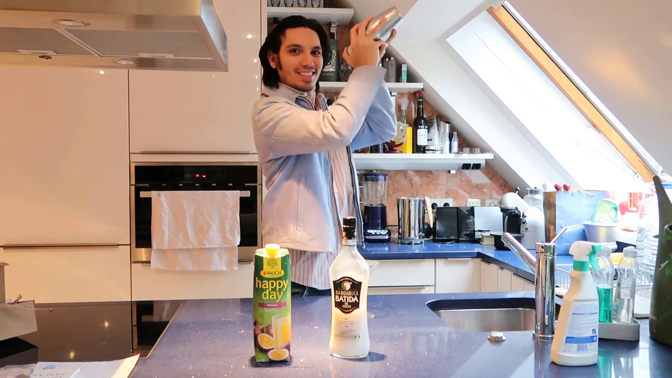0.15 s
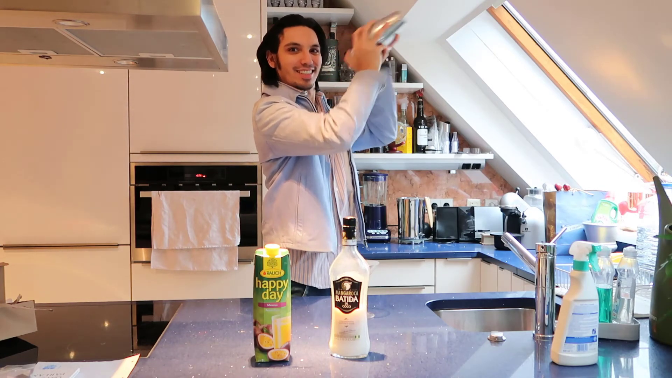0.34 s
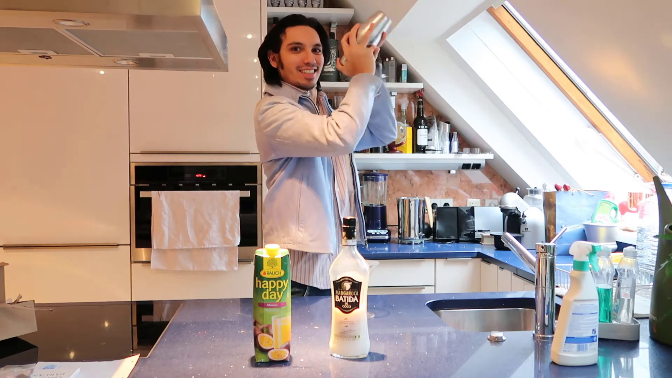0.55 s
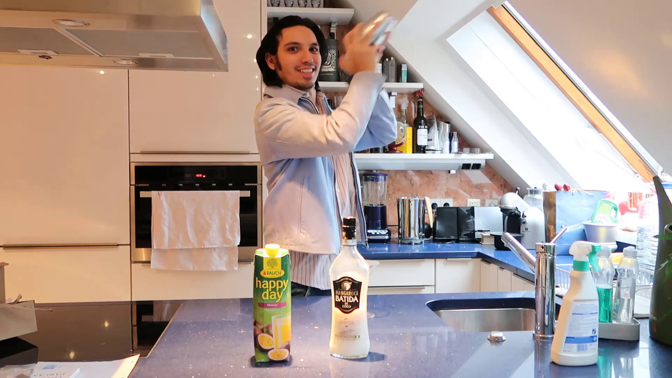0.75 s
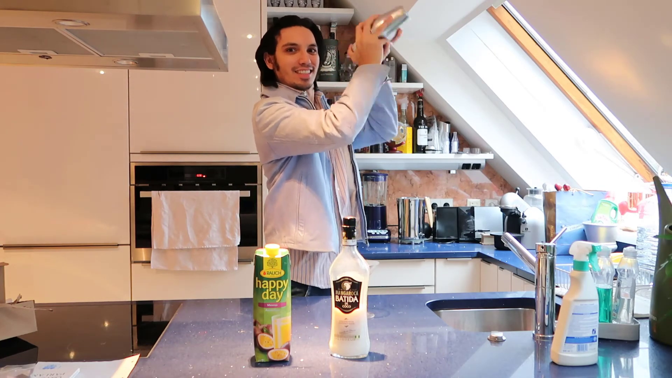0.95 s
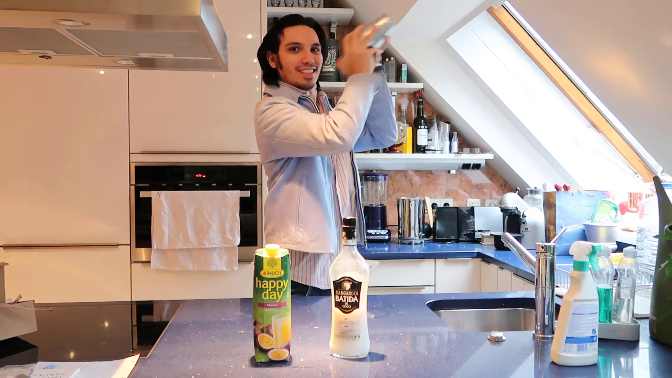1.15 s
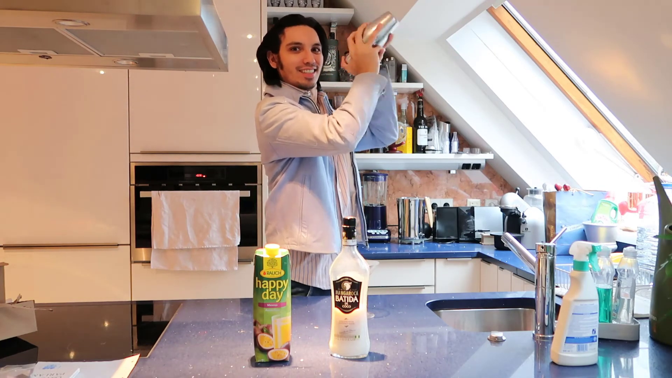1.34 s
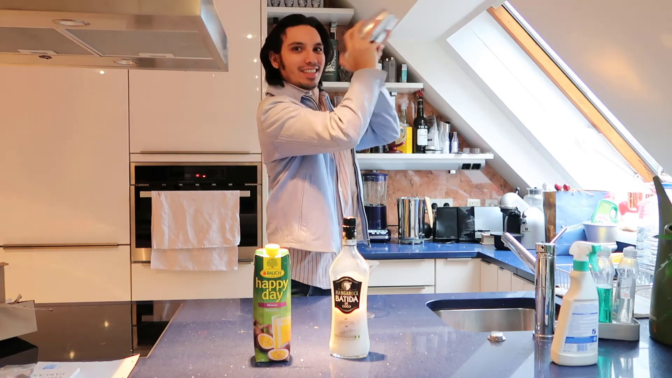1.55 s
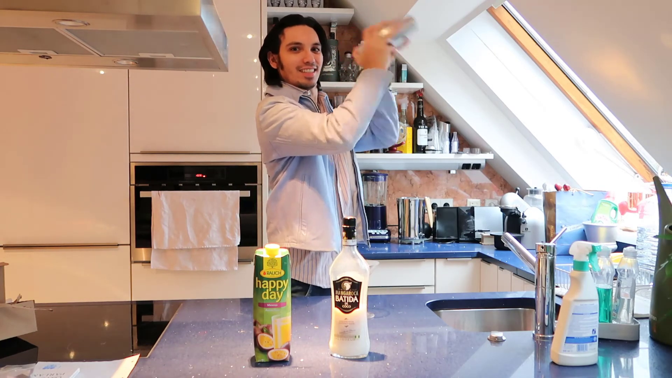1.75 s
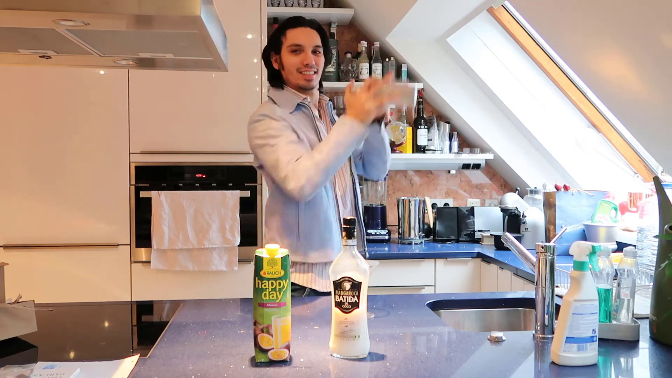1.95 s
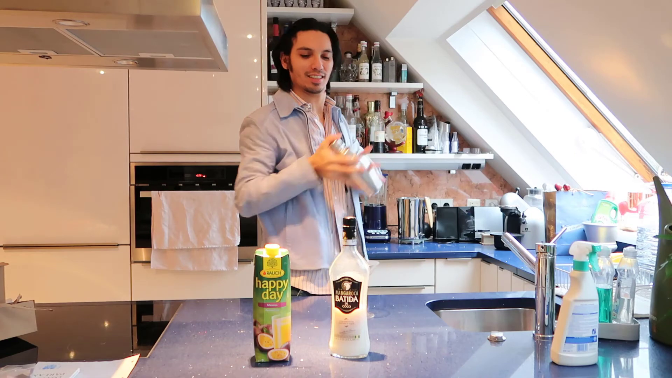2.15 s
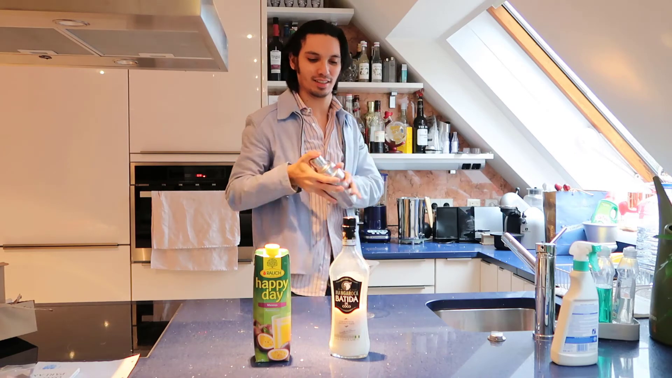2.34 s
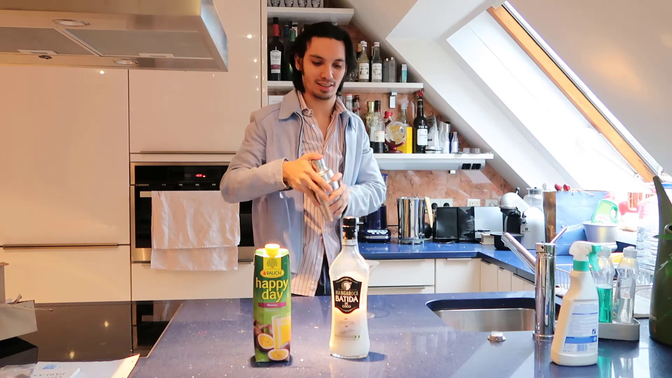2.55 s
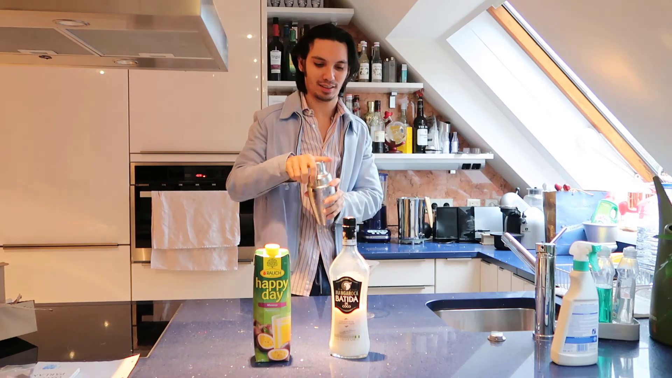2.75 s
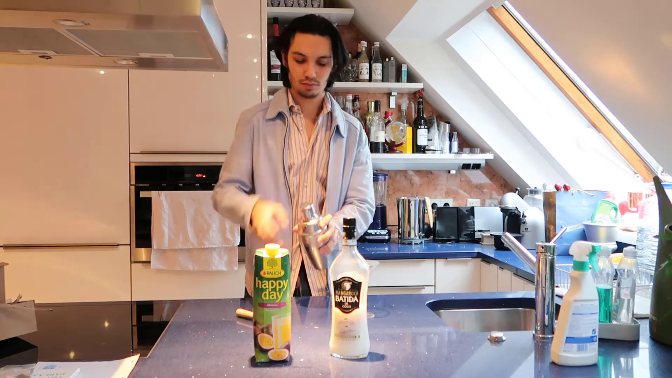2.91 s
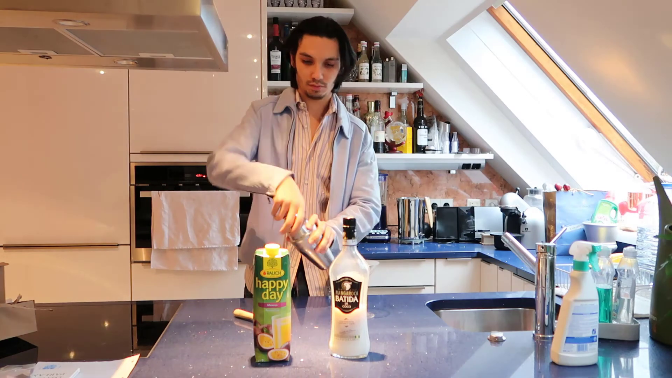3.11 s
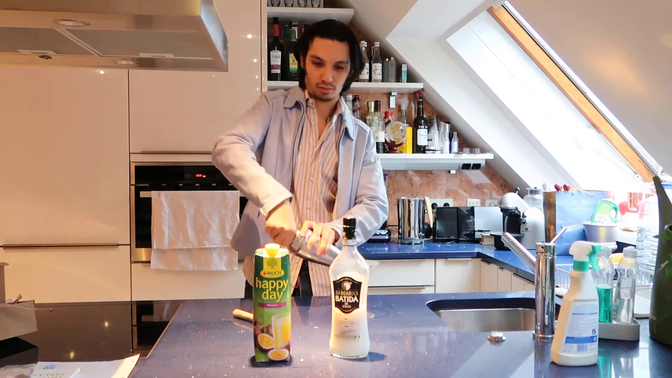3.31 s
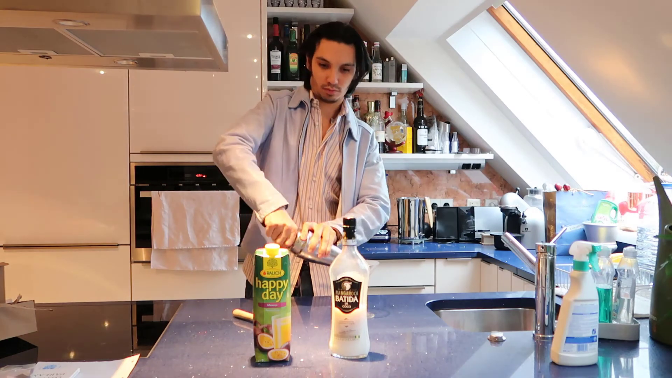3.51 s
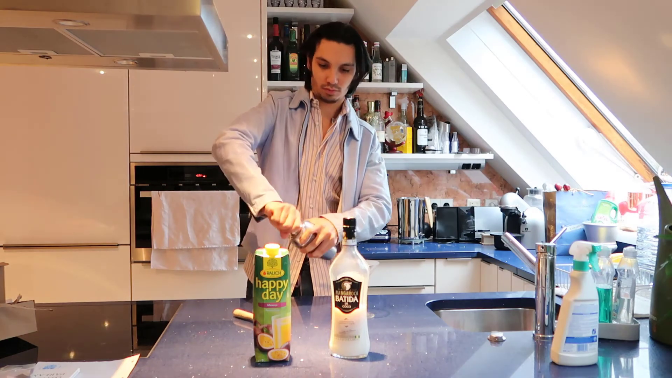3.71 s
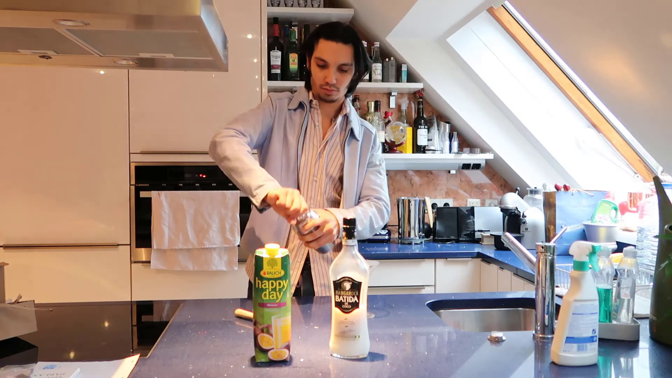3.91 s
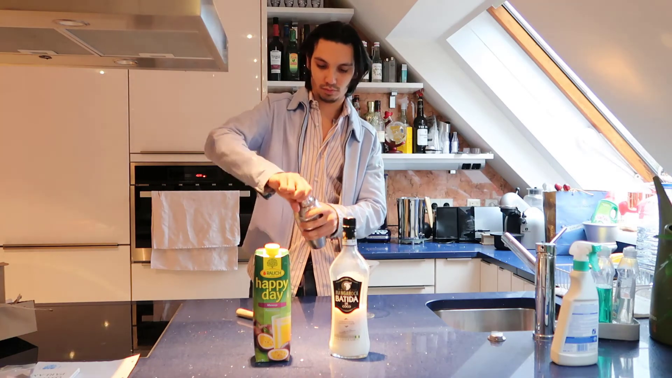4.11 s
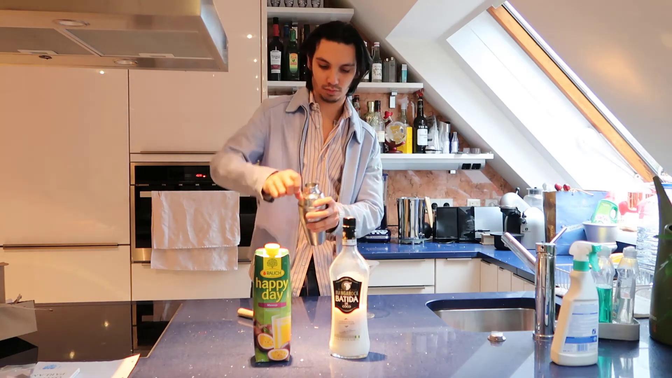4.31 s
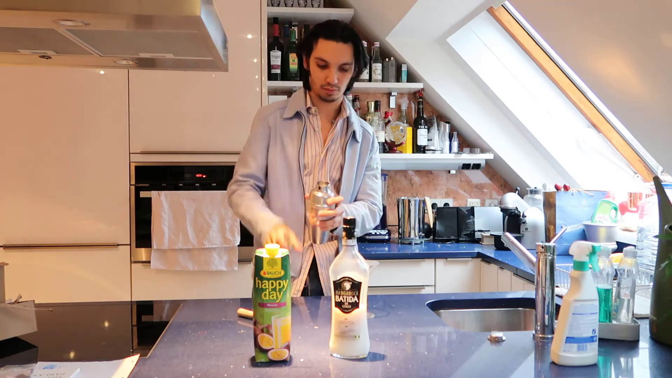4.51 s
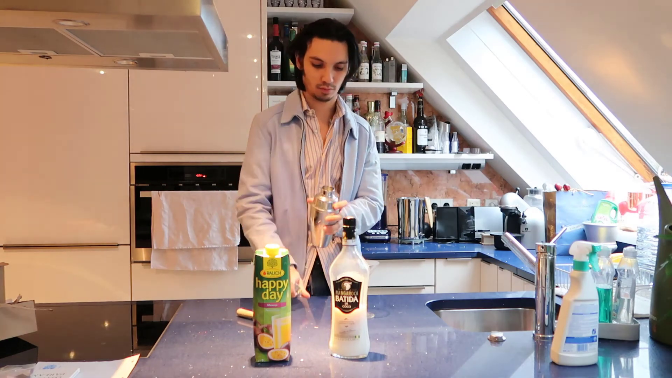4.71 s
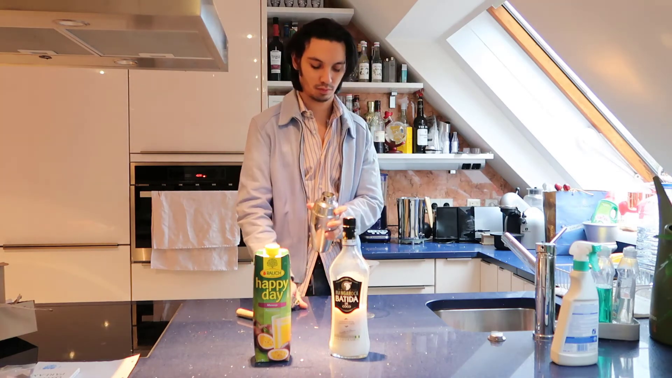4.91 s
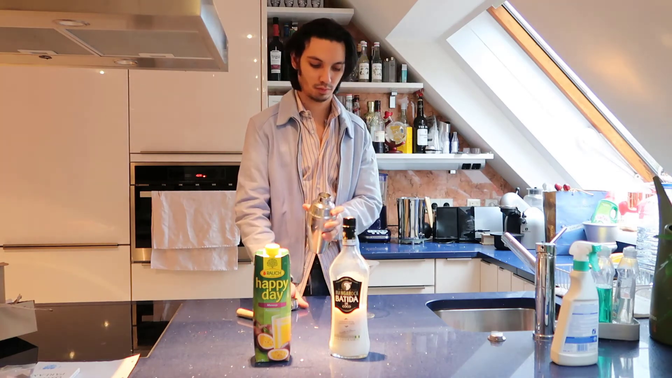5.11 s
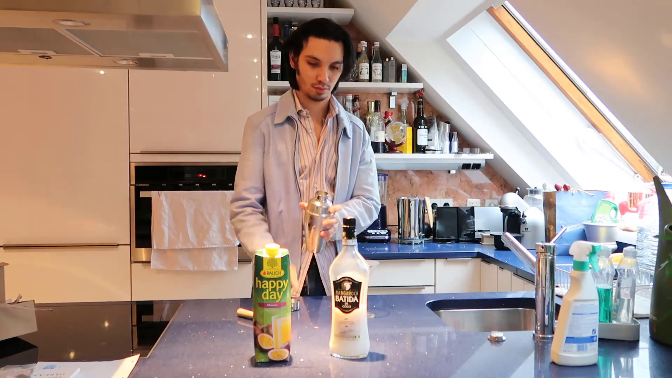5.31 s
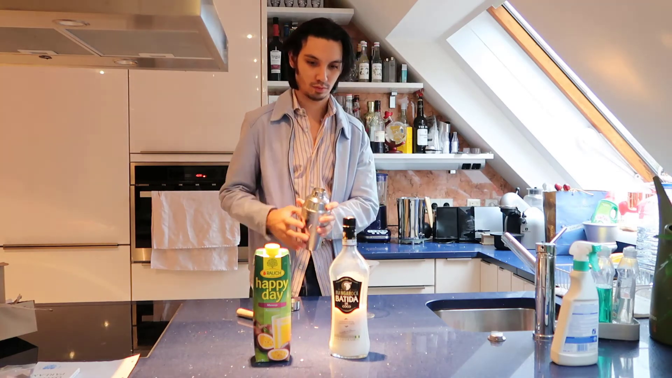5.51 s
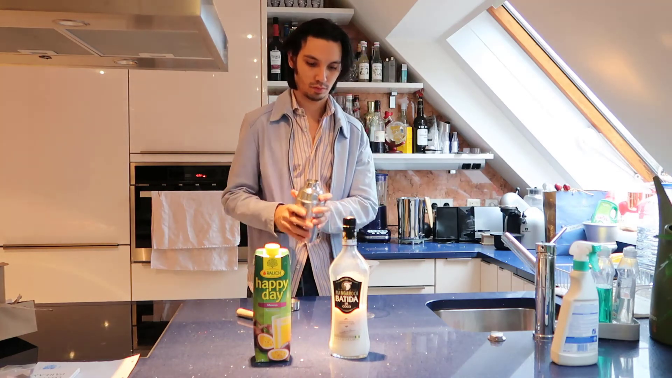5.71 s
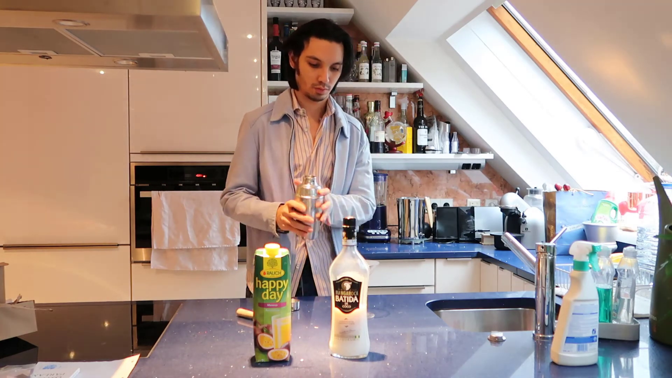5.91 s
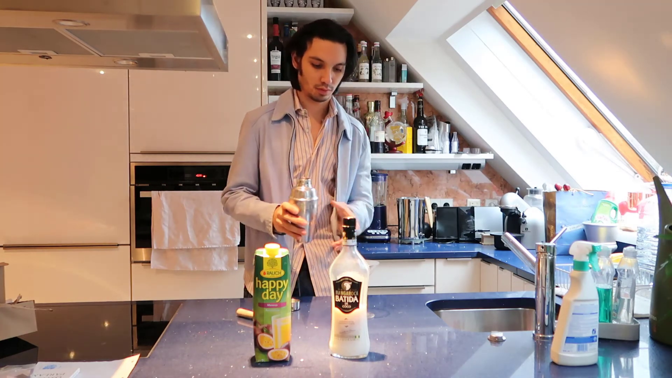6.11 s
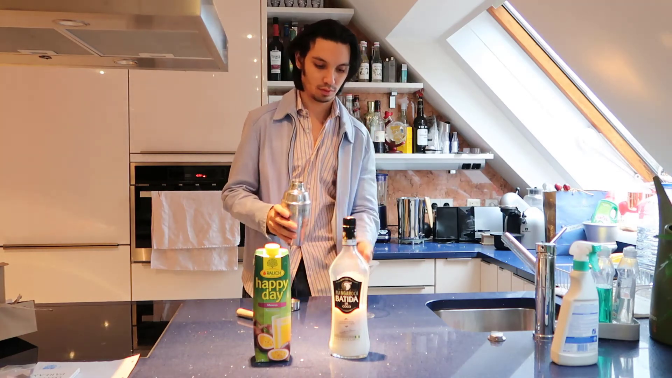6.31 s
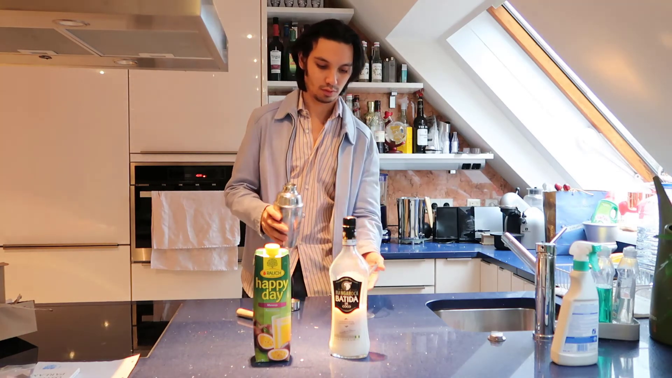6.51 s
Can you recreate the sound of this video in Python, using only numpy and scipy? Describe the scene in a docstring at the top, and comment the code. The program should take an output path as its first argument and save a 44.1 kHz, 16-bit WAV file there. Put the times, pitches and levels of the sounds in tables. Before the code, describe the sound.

Ice rattles hard in a hand-shaken steel shaker, slows and stops, then the cap and strainer top clack onto a stone kitchen counter.

```python
"""Ice in a steel cocktail shaker

Ice cubes rattle in a hand-held steel shaker in a small hard kitchen, then slide as it is tilted and opened.
Cap, then strainer top, are put down on a stone counter, where they ring and chatter.
Struck parts are banks of decaying sines; lid friction, drink and room noise are filtered noise.
Hum, a thin whine and room noise lie below; two close microphone ports listen, under gain control."""
import sys
import numpy as np
from scipy import signal
from scipy.fft import rfft, irfft, next_fast_len
from scipy.io import wavfile
from scipy.ndimage import uniform_filter1d

SR = 44100
rng = np.random.default_rng(int(sys.argv[2]) if len(sys.argv) > 2 else 0)


def how_loud(loudness_db):
    """Turn decibels into a plain amplitude multiplier (0 dB gives 1, 20 dB gives 10)."""
    steps = np.asarray(loudness_db, float) / 20
    return 10 ** steps


def store_wav(level_fs):
    """Save 16-bit WAV to argv[1]."""
    pcm = np.round(np.clip(np.atleast_2d(level_fs), -1, 1) * 32767)
    wavfile.write(sys.argv[1], SR, pcm.T.astype(np.int16))


N = 288855

# All levels are ahead of gain control. Mode levels add to blow strengths.
# room noise, port sum; shape only: (frequency [Hz], density [dB])
FLOOR_SHAPE = [(20, -16), (40, -7.5), (70, -11.5), (130, -11), (300, -13.5), (475, -16), (1100, -22),
               (2200, -23), (4000, -30), (8000, -41.5), (12000, -42.5), (13500, -42), (15000, -86)]
# room noise, port difference; shape only: (frequency [Hz], density [dB])
FLOOR_SIDE_SHAPE = [(25, -39), (95, -7.5), (450, -5.5), (600, -11.5), (1900, -18), (3350, -23.5),
                    (9270, -35), (12800, -33), (13600, -45), (15000, -73)]
FLOOR_DB_RMS, FLOOR_SIDE_DB_RMS = -52, -54.5
HUM_HZ, HUM_DB_RMS, HUM_WAVER_DB = 100, -51, 0.9
# whine, port difference only: (frequency [Hz], level before WHINE_SIDE_DB is added [dB rms])
WHINE_TONE = [(13006, -86.5)]
WHINE_WIDTH_HZ, WHINE_SIDE_DB = 120, 16.5

# near reflections off counter, sloped ceiling, cupboards: (mean lag [s], level re direct [dB])
NEAR_ECHOES = [(.0032, -6), (.0058, -8.5), (.011, -12)]
# reverberant tail: (frequency [Hz], t60 [s], relative level [dB])
ROOM_TAIL = [(247, 0.73, -7), (650, 0.37, 6), (1790, 0.44, -2.5), (4080, 0.43, 2.5), (7650, 0.38, -4),
             (14200, 0.27, -6.5)]
TAIL_DB = -4   # tail energy re direct
PLACES, PLACE_S, ECHO_SHIFT = 6, .05, .25   # room paths, step from one to the next, lag change as a share
# spectrum of the port difference: (frequency [Hz], level re port sum [dB])
PORT_WIDTH = [(60, -40), (110, -43), (200, -20), (380, -35), (700, -18), (1290, -22.5), (2380, -16),
              (4400, -6), (8120, 2.5), (15000, 8.5)]
DIRECT_SHARE = .3   # power share of the difference derived from the sum

# lid jerking on its seat as it is twisted off: (time [s], friction [dB rms])
LID_JERKS = [(3.24, -60.5), (3.703, -47.5), (3.79, -56.5), (3.94, -63)]
TWIST_HZ, SLIPS_PER_S = (5000, 13500), 3700
TWIST_RISE_S, TWIST_FADE_DB_PER_S = 0.0035, 200

# cap on counter: (time [s], strength [dB], counter knock re ring [dB])
CAP_CONTACTS = [(2.818, -17, -0.5), (2.8448, 2, -25), (2.848, -20, 15.5), (2.861, -7, -2),
                (2.8865, -4, -6.5), (2.899, -9, -2.5), (2.914, -15, 5.5)]
# cap modes: (frequency [Hz], level [dB], t60 [s])
CAP_MODES = [(1850, -22.5, 0.021), (2080, -30, 0.03), (2500, -39, 0.011), (2840, -23, 0.023),
             (3600, -18, 0.029), (3176, -32, .09), (3590, -17, 0.04), (3652, -20, .05), (3690, -18, .12),
             (3745, -21, .045), (3775, -20, 0.027), (3210, -19.5, 0.02), (4540, -18, 0.017),
             (4730, -23.5, 0.034), (5370, -19.5, 0.0052), (6340, -24, 0.0022), (8700, -31.5, 0.0086)]
# strainer top on counter: (time [s], strength [dB], counter knock re ring [dB])
STRAINER_CONTACTS = [(4.9432, 6, -15.5), (4.947, -2, -20), (4.957, -22, 2), (4.979, -27, 3),
                     (5.009, -25, -8), (5.166, -15.5, -1.5), (5.199, -27, 1), (5.24, -31, 0),
                     (5.247, -24.5, 3.5), (5.268, -38, 2), (5.297, -29, 5), (5.302, -24, -1),
                     (5.332, -37, 3)]
# strainer modes: (frequency [Hz], level [dB], t60 [s])
STRAINER_MODES = [(1210, -22, 0.0066), (1510, -27, 0.025), (1815, -18.5, 0.0085), (2030, -6, 0.0088),
                  (2200, -17.5, 0.014), (2380, -13, 0.01), (2610, -19, 0.014), (3070, -19, 0.016),
                  (3380, -24, 0.019), (3860, -17, 0.0066), (4250, -22, 0.0078), (4630, -19.5, 0.006),
                  (5310, -17, 0.005), (6040, -21, 0.0069), (5862, -23, .035), (6030, -23, .035),
                  (6068, -21, .05), (6630, -38, 0.014), (7300, -32, 0.0031), (11080, -37, 0.018)]
# stone counter modes: (frequency [Hz], level [dB], t60 [s])
COUNTER_MODES = [(214, -35.5, 0.021), (342, -23.5, 0.0093), (596, -21, 0.0091), (860, -21, 0.028),
                 (1360, -6, 0.0034), (2340, -10, 0.0082), (4500, -30, 0.0033), (8000, -23, 0.0026)]
CHATTER_S, CHATTER_DB, CHATTER_FADE_DB = 0.03, -9.5, -14.5   # rebound time span, first level, further drop
DULLING_PER_OCTAVE = 0.2   # dB per octave about 1 kHz, per dB below the hardest touch
CONTACT_CYCLES = 0.85   # approximate swell of each mode

# shell modes, damped by hands and drink: (frequency [Hz], level [dB], t60 [s])
SHELL_MODES = [(687, -60, 0.0067), (930, -37, 0.0085), (1350, -16, 0.0074), (1476, -16.5, 0.012),
               (1640, -13, 0.0089), (1834, -12, 0.014), (2020, -14, 0.012), (2284, -13, 0.015),
               (2507, -7, 0.0083), (2800, -7.5, 0.006), (3080, -12.5, 0.0062), (3620, -7.5, 0.004),
               (4247, -13, 0.0078), (4530, -8, 0.0045), (5250, -15, 0.0042), (5900, -15, 0.0046),
               (6700, -18, 0.0027), (7840, -17.5, 0.0023), (9600, -17.5, 0.001), (13400, -17, 0.00081)]
# air in the open neck, one mode: (frequency [Hz], level [dB], t60 [s])
NECK_MODE = (2143, -9.5, 0.023)
OPENED_S = 3   # the neck rings from here
LOW_BELOW_HZ, HIGH_ABOVE_HZ = 2150, 3500   # bounds of low, middle and high shell modes
CONTACT_SCATTER_S_PER_KHZ = .0003   # a rolling cube wakes high modes most loosely in time
RADIATES_HZ = (626, 12200)   # a small shell sends little bass; soft wet contacts make little treble
# single cubes on the wall: (time [s], middle modes [dB], low modes [dB], high modes [dB])
CUBE_BLOWS = [(0.018, -9, -12, -4), (0.0416, -5, -30, -4), (0.0482, -10, -13, -11), (0.1047, 4, 4, 1),
              (0.148, -7.5, -16, -26), (0.2112, -9.5, -34, -22), (0.2403, -5.5, -34, -12.5),
              (0.3401, -2, -35, -5.5), (0.247, -12.5, -37, -25), (0.3533, -2, -24, -22),
              (0.361, -2.5, -30, -15), (0.3683, -5, -27, -26), (0.426, -8.5, -22, -21),
              (0.4398, -3.5, -1, -18), (0.4439, -4.5, -12, -26), (0.4547, -7, -15, -22),
              (0.468, -7, -14, -3), (0.564, -6, -28, -18), (0.567, -12, -29, -23), (0.593, -6.5, -25, -23),
              (0.6556, 0, -22, -4.5), (0.6683, -6, -23, -30), (0.7164, -6.5, -37, -32),
              (0.7575, -9, -19, -29), (0.8007, -14, -30, -9), (0.851, -7, -24, -13.5),
              (0.877, -3, -32, -24), (0.8801, -5, -26, -16), (0.8929, 4, -6, -7), (0.8975, -2, 2, -9),
              (0.9667, -4, -26, -8.5), (0.9839, -14, -32, -5), (1.086, -7.5, -26, -12),
              (1.111, -9, -25, -6.5), (1.1633, -3.5, -15, -30), (1.1965, -1.5, -14, -18),
              (1.3063, -4.5, -30, -2.5), (1.3118, -4, -35, -30), (1.333, -8, -31, -17),
              (1.3436, -5, -34, -23), (1.3871, -7, -30, -29), (1.392, -4.5, -24, -21),
              (1.3993, -19, -14, -25), (1.4278, -10, -33, -23), (1.481, -28, -6, -30),
              (1.498, -4, -28, -28), (1.5024, 1, -21, -20), (1.5141, -4, -25, -31),
              (1.5456, -8, -26, -11.5), (1.5712, -3, -15, -12), (1.6003, -1.5, -22, 2),
              (1.614, -1.5, -24, -14), (1.6212, -0.5, -32, -7), (1.6342, -1, -26, -10),
              (1.6672, 0.5, -9, -29), (1.6927, -1.5, -25, -23), (1.697, -23, 6, -5),
              (1.7722, -4, -22, -4.5), (1.8065, -1, -32, -13), (1.816, -4, -30, -22),
              (1.8248, -7.5, -29, -5), (1.838, -14, -28, -20), (1.8925, -9, -1.5, -13.5),
              (1.9835, -23, -23, -26), (1.9901, -4.5, -22, -25), (2.0551, -8, -37, -12.5),
              (2.075, -29, -23, -25), (2.1089, -9, -21, -26), (2.1231, -10.5, -24, -27),
              (2.1587, -13, -16.5, -13.5), (2.2778, -15.5, -27, -23.5), (2.2825, -17, -19, -34),
              (2.326, -24, -39, -28), (2.4104, -25.5, -39, -31.5), (2.471, -27.5, -42, -32),
              (2.571, -34, -45, -44), (2.5926, -19, -28, -51), (2.646, -46, -46, -56),
              (3.269, -32.5, -43, -38), (3.5088, -34, -28, -38.5), (3.5326, -34, -37, -52),
              (3.6155, -34, -37, -36), (3.712, -30, -24, -29), (3.7181, -25.5, -30, -21),
              (3.7875, -30, -22.5, -22.5), (3.792, -33, -24, -27), (3.7445, -29, -33, -40),
              (3.9688, -28, -46, -41), (4.004, -34, -26, -44), (4.0637, -35, -37, -54),
              (4.0914, -35, -51, -52), (4.13, -29.5, -52, -34.5), (4.24, -37.5, -45, -43),
              (4.3076, -39, -44, -40), (4.362, -40, -49, -43), (5.7768, -30, -48, -36),
              (5.7848, -28, -47, -25.5), (5.7984, -28, -31, -26.5), (5.8165, -39, -37, -41),
              (6.1696, -39, -35.5, -55)]
# arm strokes tumbling the ice: (time [s], rattle [dB], low modes re rattle [dB], high modes re rattle [dB])
ARM_STROKES = [(-.03, -15, -7, -2), (.04, -44, -14, -4), (.105, -26.5, -7, 2.5), (.235, -24.5, -10, 0),
               (.325, -21, -5, 2.5), (.428, -21, 0, 3.5), (.562, -20, -22, 2.5), (.652, -22.5, -7, -4),
               (.755, -19, -12, -6.5), (.87, -20, -0.5, 0.5), (.962, -24, -21, 0), (1.045, -20, -14, -3.5),
               (1.095, -22, 0, 3), (1.195, -22, -3, -0.5), (1.285, -18.5, -24, -0.5), (1.38, -22.5, -1, -5),
               (1.478, -30.5, 6, 9), (1.565, -18, -10, 1), (1.605, -28, -16, 6), (1.69, -20.5, -6, 0),
               (1.766, -24, -16, 3.5), (1.81, -41, -16, -20), (1.893, -23, -9, -22), (1.975, -45, -18, -14),
               (2.056, -34, -10, -8), (2.12, -38, 4, -2), (2.278, -41.5, -2, -4.5)]
# ice sliding as the shaker tips: (time [s], rattle [dB], low modes re rattle [dB], high modes re rattle [dB])
ICE_SLIDES = [(2.33, -52, 2, -4), (2.59, -56, -13, 1), (3.24, -50, -3, -6), (3.506, -54, 6, 0),
              (3.69, -38, 6, 0.5), (3.787, -66, -8, -8), (3.925, -45, -5, -7), (4.06, -47.5, -3, -5),
              (4.24, -51, 4, -4), (4.55, -57, -1, -2), (5.6, -51.5, -4, -1), (5.776, -43.5, -1, -11),
              (6.05, -56.5, 1, 0.5), (6.16, -60.5, -7, 0)]
STROKE_RISE_S, STROKE_FADE_DB_PER_S = 0.011, 74
SLIDE_RISE_S, SLIDE_FADE_DB_PER_S = 0.0077, 76
KNOCKS_PER_S, KNOCK_DB, KNOCK_SPREAD_DB = 480, -2.5, 2.5   # rate, base re rattle, exponential scale
SLOSH_HZ, SLOSH_DB = (197, 1180), -25   # dB rms re rattle

GAIN_KNEE_DB, GAIN_SLOPE, GAIN_MAKEUP_DB, GAIN_RELEASE_DB_PER_S = -33, 0.11, 2, 46
BALANCE_DB = -0.6   # left re right


def at_hz(points, hz, column=1):
    """Table column interpolated on a log-frequency axis."""
    points = np.array(points, float)
    return np.interp(np.log(hz + 1), np.log(points[:, 0] + 1), points[:, column])


def band_pass(x, edges_hz, order):
    """Butterworth band-pass."""
    return signal.sosfilt(signal.butter(order, edges_hz, "band", fs=SR, output="sos"), x)


def coloured_noise(spectrum):
    """Steady noise of the given spectral shape, rms 1."""
    gain = how_loud(at_hz(spectrum, np.fft.rfftfreq(N, 1 / SR)))
    x = irfft(rfft(rng.standard_normal(N)) * gain, N)
    return x / x.std()


def swells(s, db, rise_s, fade_db_per_s):
    """Summed power, in dB, of bursts that rise quickly and fade steadily."""
    hop = 32
    since = np.arange(0, N, hop) / SR - np.asarray(s)[:, None]
    faded_db = np.asarray(db)[:, None] - fade_db_per_s * np.maximum(since, 0)
    power = np.clip(since / rise_s, 0, 1) ** 2 * how_loud(2 * faded_db)
    total_db = 10 * np.log10(power.sum(axis=0) + 1e-12)
    return np.interp(np.arange(N) / hop, np.arange(since.shape[1]), total_db)


def ring(clicks, hz, t60):
    """Decaying sine set off by each click through a short contact resonance."""
    w = 2 * np.pi * hz / SR
    r = how_loud(-60 / (t60 * SR))
    soft = np.exp(-np.pi * hz / (CONTACT_CYCLES * SR))
    contact_b = [(1 - soft ** 2) / 2, 0, (soft ** 2 - 1) / 2]
    contact_a = [1, -2 * soft * np.cos(w), soft ** 2]
    pushed = signal.lfilter(contact_b, contact_a, clicks + 1e-18)
    return signal.lfilter([0, np.sin(w)], [1, -2 * r * np.cos(w), r * r], pushed)


def strike(modes, at, strength_db, spread_db, scatter_s_per_khz=0):
    """Blows at samples `at` on a mode bank; rows, sent ahead and sideways, draw their mode signs apart."""
    luck = rng.standard_normal((len(at), len(modes), 4))   # level, sign ahead, sign sideways, delay
    out = np.zeros((2, N))
    span = slice(at.min(), at.max() + SR // 2)
    for k, (hz, level_db, t60) in enumerate(modes):
        delay_s = np.abs(luck[:, k, 3]) * scatter_s_per_khz * hz / 1000
        when = np.minimum(at + (delay_s * SR).astype(int), N - 1)
        height = how_loud(strength_db(hz) + level_db + spread_db * luck[:, k, 0])
        clicks = np.zeros((2, N))
        clicks[:, when] = height * np.sign(luck[:, k, 1:3].T)
        out[:, span] += ring(clicks[:, span], hz, t60)
    return out


def hum():
    """Appliance hum at twice the mains rate: a sine of slowly wavering level."""
    slow = uniform_filter1d(uniform_filter1d(rng.standard_normal(N), size=3000), size=3000)
    level = how_loud(HUM_DB_RMS + HUM_WAVER_DB * slow / slow.std())
    return np.sqrt(2) * level * np.sin(2 * np.pi * HUM_HZ * np.arange(N) / SR)


def whine():
    """Thin electrical whine: narrow noise near the top of hearing."""
    (hz, db), = WHINE_TONE
    x = band_pass(rng.standard_normal(N), (hz - WHINE_WIDTH_HZ / 2, hz + WHINE_WIDTH_HZ / 2), order=2)
    return how_loud(db + WHINE_SIDE_DB) * x / x.std()


def kitchen(x):
    """Direct sound, near echoes and a tail dying band by band; crossfading paths suit a moving source."""
    t = np.arange(int(.6 * SR)) / SR
    paths = np.zeros((PLACES, 2, len(t)))
    for low in 125 * 2. ** np.arange(7):   # octave bands
        band = band_pass(rng.standard_normal(paths.shape), (low, 2 * low), order=2)
        hz = low * np.sqrt(2)
        paths += band * how_loud(at_hz(ROOM_TAIL, hz, column=2) - 60 * t / at_hz(ROOM_TAIL, hz))
    energy = np.sum(paths[:, 0] ** 2) / PLACES
    paths *= np.clip(t / 0.01, 0, 1) * how_loud(TAIL_DB) / np.sqrt(energy)
    paths[..., 0] += 1   # direct
    shift = 1 + ECHO_SHIFT * rng.uniform(-1, 1, (PLACES, len(NEAR_ECHOES)))
    step = np.arange(N) / (PLACE_S * SR)
    size = next_fast_len(N + len(t))
    out = 0
    for place in range(PLACES):
        for k, (lag_s, db) in enumerate(NEAR_ECHOES):
            sides = np.array([1, (-1) ** k])   # echoes from alternate sides
            paths[place, :, int(lag_s * shift[place, k] * SR)] += how_loud(db) * sides
        distance = np.abs((step - place + PLACES / 2) % PLACES - PLACES / 2)
        here = np.clip(1 - distance, 0, 1)
        out = out + rfft(x * here, size) * rfft(paths[place], size)
    return irfft(out, size)[:, :N]


def lid_twist():
    """Steel rubs on steel: dense random slips, band-passed, under jerk envelopes."""
    slips = (rng.random(N) < SLIPS_PER_S / SR) * rng.standard_normal((2, N))
    hiss = band_pass(slips, TWIST_HZ, order=2)
    friction_db = swells(*np.transpose(LID_JERKS), TWIST_RISE_S, TWIST_FADE_DB_PER_S)
    return hiss / hiss.std() * how_loud(friction_db)


def put_down(touches, modes, low_hz, count=7):
    """A steel part chatters on the counter: steel rings, stone knocks; softer touches are duller."""
    s, db, knock_db = np.repeat(touches, count, axis=0).T
    late = rng.random(len(s))
    late[::count] = 0   # the touch itself; the rest are rebounds
    db = db + (late > 0) * (CHATTER_DB + CHATTER_FADE_DB * late)
    at = ((s + CHATTER_S * late) * SR).astype(int)

    def ring_db(hz):
        return db + DULLING_PER_OCTAVE * (db - db.max()) * np.log2(hz / 1000)

    def stone_db(hz):
        return ring_db(hz) + knock_db

    steel = strike(modes, at, ring_db, spread_db=2.8)
    stone = strike(COUNTER_MODES, at, stone_db, spread_db=1.3)
    return band_pass(steel + stone, (low_hz, 12000), order=2)


def slosh(rattle_db):
    """The drink rushes with the ice: dull noise following the rattle level."""
    rush = band_pass(rng.standard_normal((2, N)), SLOSH_HZ, order=2)
    return rush / rush.std() * how_loud(rattle_db + SLOSH_DB)


def ice_motion():
    """Rattle level [dB] of low, middle and high modes; stroke and slide powers add."""
    motions = ((ARM_STROKES, STROKE_RISE_S, STROKE_FADE_DB_PER_S),
               (ICE_SLIDES, SLIDE_RISE_S, SLIDE_FADE_DB_PER_S))
    parts = []
    for rows, rise_s, fade in motions:
        s, db, low_db, high_db = np.transpose(rows)
        parts.append([swells(s, db + part_db, rise_s, fade) for part_db in (low_db, 0, high_db)])
    return 10 * np.log10(np.sum(how_loud(2 * np.array(parts)), axis=0))


def shell(at, low_db, middle_db, high_db, spread_db):
    """Each blow wakes three mode groups by its own levels; once open, the neck air rings too."""
    neck_db = np.where(at > OPENED_S * SR, middle_db, -np.inf)

    def group_db(hz):
        if hz == NECK_MODE[0]:
            return neck_db
        if hz < LOW_BELOW_HZ:
            return low_db
        return high_db if hz > HIGH_ABOVE_HZ else middle_db

    return strike(SHELL_MODES + [NECK_MODE], at, group_db, spread_db, CONTACT_SCATTER_S_PER_KHZ)


def rattle(motion_db):
    """Random small knocks of ice on ice and steel, a few much harder than the rest."""
    at = np.flatnonzero(rng.random(N) < KNOCKS_PER_S / SR)
    db = KNOCK_DB + KNOCK_SPREAD_DB * np.minimum(rng.exponential(1, len(at)), 3)
    return shell(at, *(db + motion_db[:, at]), spread_db=6.5)


def cubes():
    """Single cube blows on the shell at listed times."""
    s, middle_db, low_db, high_db = np.transpose(CUBE_BLOWS)
    return shell((s * SR).astype(int), low_db, middle_db, high_db, spread_db=2.5)


def shaker():
    """All ice as the shell radiates it, plus the drink."""
    motion_db = ice_motion()
    ice = band_pass(rattle(motion_db) + cubes(), RADIATES_HZ, order=3)
    return ice + slosh(motion_db[1])


def scene():
    """Sources in the room as port sum and difference, background added, then left and right."""
    cap = put_down(CAP_CONTACTS, CAP_MODES, low_hz=160)
    strainer = put_down(STRAINER_CONTACTS, STRAINER_MODES, low_hz=330)
    mid, diffuse = kitchen(shaker() + lid_twist() + cap + strainer)
    # close ports: the direct part of the difference lags the sum by a quarter cycle
    gain = how_loud(at_hz(PORT_WIDTH, np.fft.rfftfreq(N, 1 / SR)))
    direct_part = -1j * np.sqrt(DIRECT_SHARE) * rfft(mid)
    diffuse_part = np.sqrt(1 - DIRECT_SHARE) * rfft(diffuse)
    side = irfft(gain * (direct_part + diffuse_part), N)
    mid = mid + hum() + how_loud(FLOOR_DB_RMS) * coloured_noise(FLOOR_SHAPE)
    side = side + how_loud(FLOOR_SIDE_DB_RMS) * coloured_noise(FLOOR_SIDE_SHAPE) + whine()
    return np.array([mid + side, mid - side])


def gain_control(x):
    """Loud sound pulls the gain down quickly; it creeps back up."""
    db = 10 * np.log10(uniform_filter1d(np.mean(x ** 2, axis=0), size=800) + 1e-12)
    ramp = GAIN_RELEASE_DB_PER_S * np.arange(N) / SR
    held = np.maximum.accumulate(db + ramp) - ramp   # peak hold with linear release
    gain_db = GAIN_MAKEUP_DB - GAIN_SLOPE * np.maximum(held - GAIN_KNEE_DB, 0)
    return x * how_loud(uniform_filter1d(gain_db, size=400))


def roll_off(x):
    """The treble ends steeply here."""
    return signal.sosfilt(signal.butter(12, 15700, fs=SR, output="sos"), x)


def record(dry):
    """Gain control, right port slightly louder, highest peaks rounded."""
    balance = how_loud(np.array([[BALANCE_DB / 2], [-BALANCE_DB / 2]]))
    x = gain_control(dry) * balance
    mix = np.tanh(x / 2) * 2
    return roll_off(mix)


dry = scene()
out = record(dry)
store_wav(out)
```